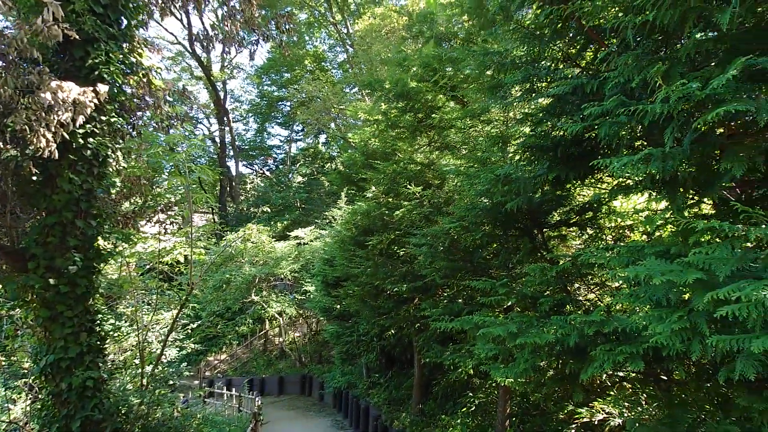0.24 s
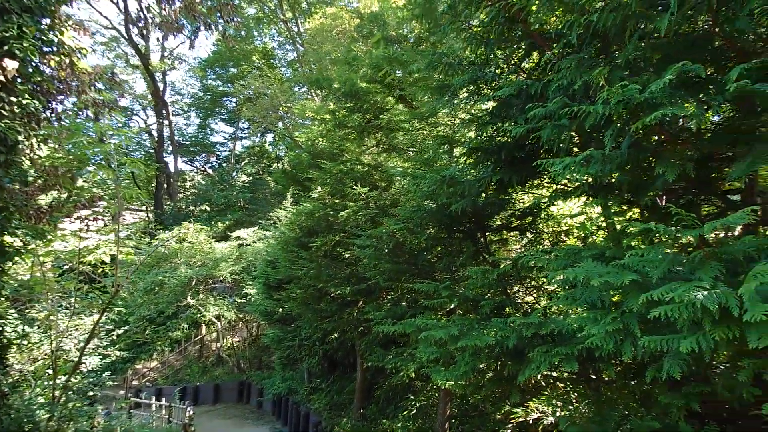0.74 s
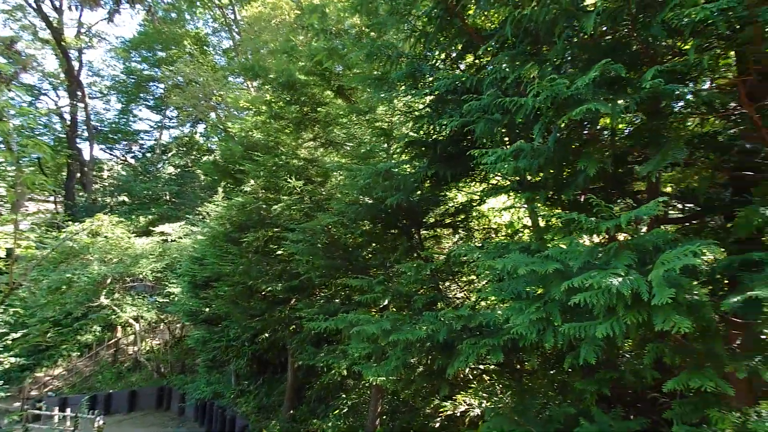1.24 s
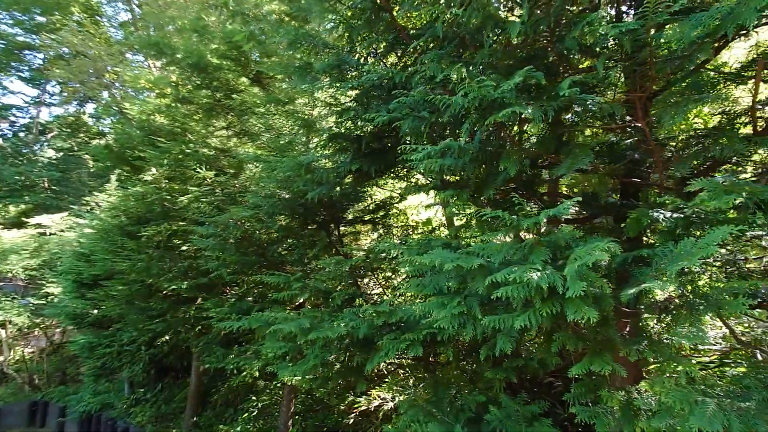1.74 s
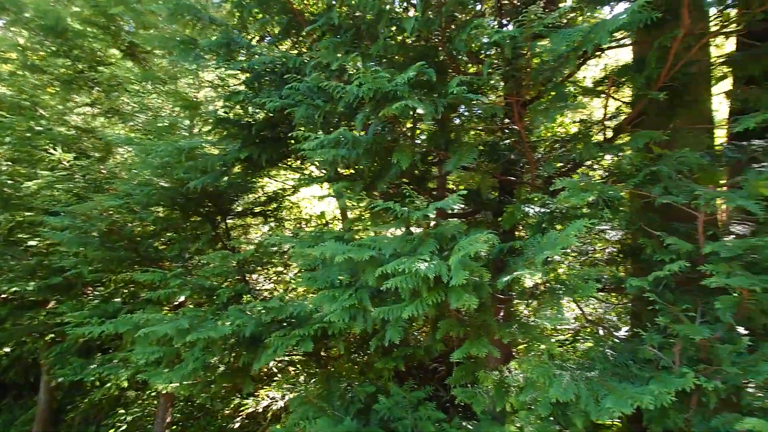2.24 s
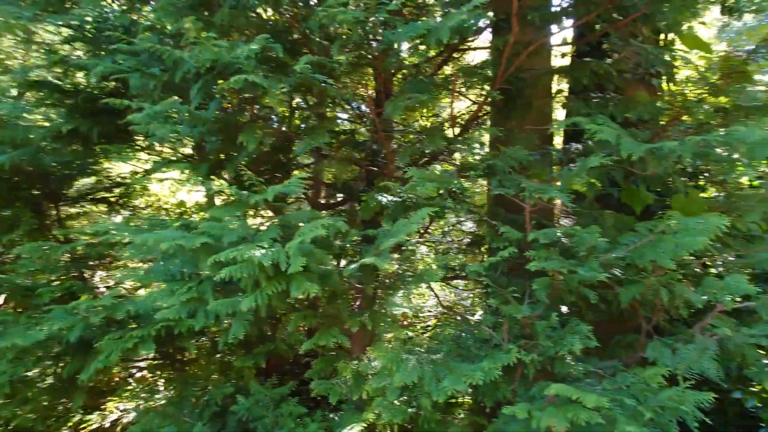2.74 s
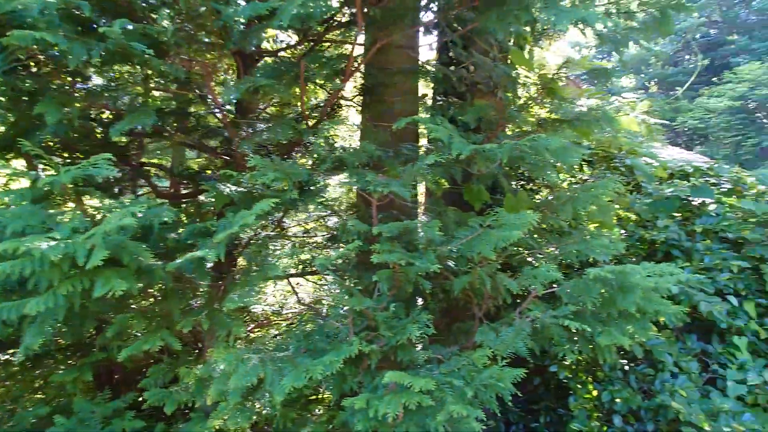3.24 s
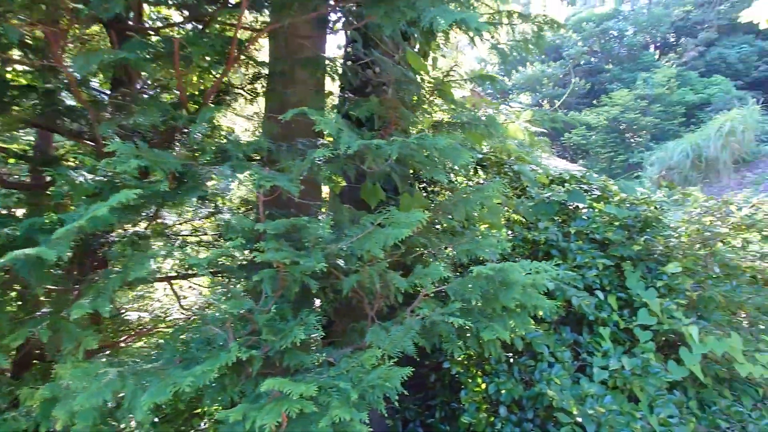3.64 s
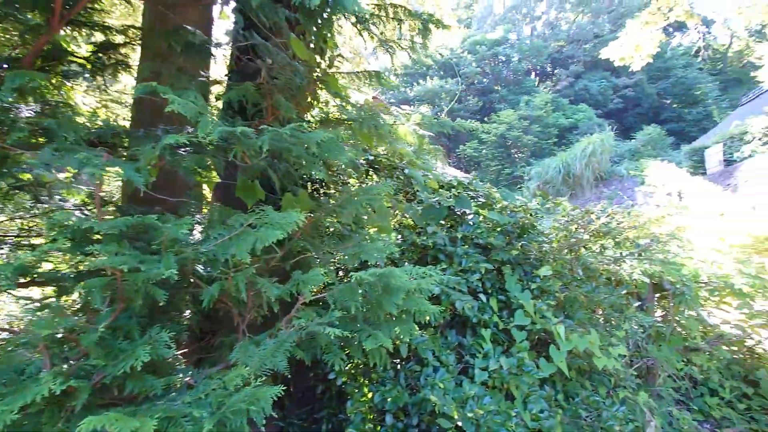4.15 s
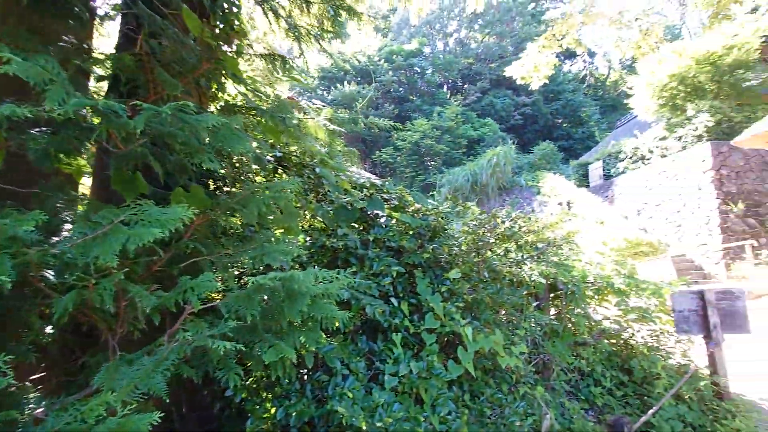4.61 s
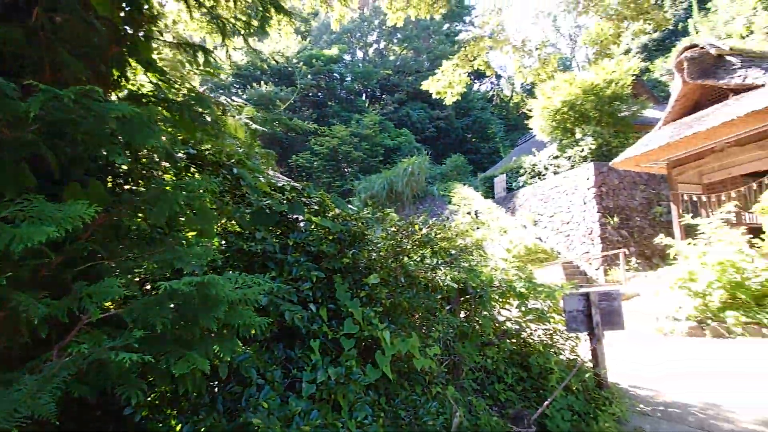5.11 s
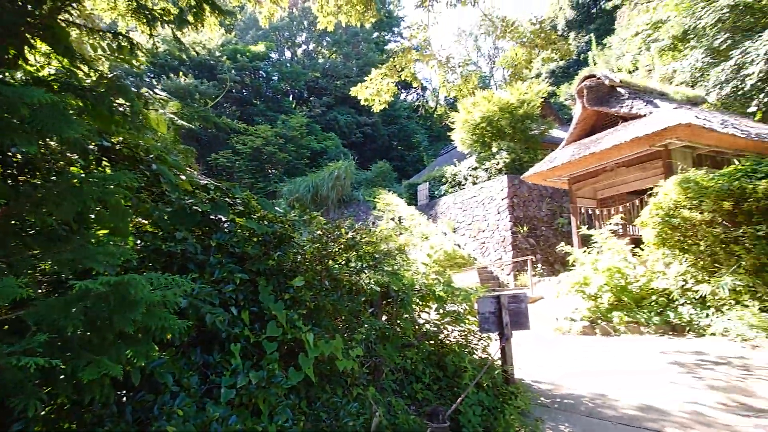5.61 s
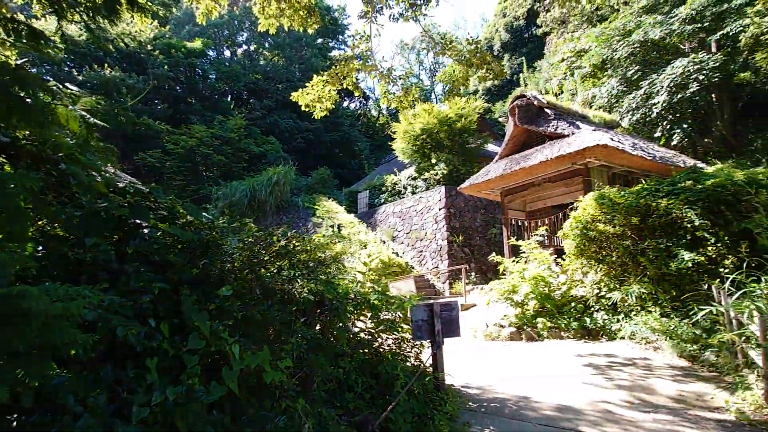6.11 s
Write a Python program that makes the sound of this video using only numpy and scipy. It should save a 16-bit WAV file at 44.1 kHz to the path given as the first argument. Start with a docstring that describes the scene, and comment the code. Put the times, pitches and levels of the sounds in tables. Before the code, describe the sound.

In a summer wood, a dense chorus of cicadas hisses and sizzles without a break, the nearest ones on the right. The shrill sound wavers only slightly, and thin tones from single distant cicadas enter from about the middle. A few soft handling knocks touch the microphone along the way. A barely audible crow calls far off, and a faint low rumble and hum lie underneath.

```python
"""A crowd of cicadas shrills near 8 kHz in tall summer trees, each clicking two tiny drum skins.
A few sizzling cicadas on the right pump their bellies, rocking between a low and a high resonance.
Far-off cicadas blur into a thin whine, and single ones join in on their own pitch.
Beneath lie a distant crow, a few soft knocks of a hand on the microphone, a faint rumble and low hums."""
import sys
import numpy as np
from scipy import signal
from scipy.fft import rfft, irfft, next_fast_len
from scipy.io import wavfile

SR = 44100
rng = np.random.default_rng(int(sys.argv[2]) if len(sys.argv) > 2 else 0)


def master(y):
    """Save y as 16-bit WAV."""
    cut = np.clip(np.atleast_2d(y).T, -1, 1)
    pcm = np.round(cut * 32767)  # scale
    wavfile.write(sys.argv[1], SR, pcm.astype(np.int16))


N = 280917

# body resonance of the shrill cicadas: pitch_hz, gain_db
SHRILL_BODY = [(4060, -48), (6900, -17), (7760, -1), (8410, 1.5), (11600, -23), (15100, -37), (22000, -120)]
# how the shrill crowd's loudness moves: time_s, relative_level_db
SHRILL_LOUDNESS = [(0.0, -29), (0.67, -30), (0.96, -29), (2.68, -32), (4.74, -30), (6.37, -31)]
# low body resonance of the sizzlers: pitch_hz, gain_db
SIZZLE_LOW_BODY = [(2060, -29), (3500, -22.5), (5100, -3), (6070, 0.5), (6850, -3.5), (7100, -5),
                   (9230, -29), (15600, -120)]
# high body resonance of the sizzlers: pitch_hz, gain_db
SIZZLE_HIGH_BODY = [(5000, -70), (8000, -30), (11000, -12), (12000, -8.5), (13000, -8), (14000, -4.5),
                    (15000, 0), (15800, .5), (16400, -30)]
# loudness of the high sizzle, dipping and rising as the microphone turns: time_s, relative_level_db
SIZZLE_HIGH_LOUDNESS = [(0.1, -43), (0.6, -43), (1.46, -45), (1.65, -43), (2.6, -45), (3.45, -42),
                        (5.36, -42), (6.37, -43)]
# steady ringing within the sizzle: pitch_hz, width_hz, gain_db
SIZZLE_RINGING = [(5340, 41, -4), (6230, 90, 1)]
# narrow resonances of the far cicadas: pitch_hz, width_hz, gain_db
WHINE_RESONANCES = [(2160, 200, -4.5), (2380, 190, -6.5), (2560, 50, -7), (2755, 60, -0.5),
                    (2823, 100, 0.5), (3240, 100, -9), (3464, 50, -8), (3770, 62, -6)]
# single far cicadas joining in: start_s, length_s, pitch_hz, level_db
SOLO_SONGS = [(2.6, 4.9, 4935, -51), (2.8, 1.9, 2818, -64.5), (2.9, 4.1, 2561, -68),
              (3.3, 3.7, 5300, -54.5), (5.2, 1.8, 5900, -53), (5.6, 1.4, 2825, -65.5)]
# caws of the crow: start_s, length_s, throat_pitch_hz, relative_level_db
CROW_CAWS = [(1.48, .54, 885, -64), (3.59, 0.52, 930, -61.2), (5.9, 0.15, 870, -69)]
# hand knocks, where harder touches tend to be higher and shorter: start_s, relative_peak_db, pitch_hz
HAND_KNOCKS = [(.09, -45.5, 310), (1.446, -40, 2300), (1.54, -56, 170), (2.429, -55, 130),
               (3.336, -48, 850), (3.9, -60, 100), (4.135, -57, 60), (4.929, -51, 260), (5.035, -52, 170)]
# tone colour of the outdoor rumble: pitch_hz, gain_db
RUMBLE_COLOUR = [(15, -47), (25, -11.5), (112, -7.5), (151, -1), (234, 1), (377, -0.3), (564, -5),
                 (800, -5.5), (893, -4), (1050, -5), (1440, -6.5), (2000, -6.5), (2600, -38), (4400, -120)]
# how alike the rumble is at both ears: pitch_hz, likeness_0_to_1
RUMBLE_LIKENESS = [(40, 0), (90, 0), (170, .55), (350, 0.74), (700, 0.7), (1400, 0)]
# which side each pitch comes from: pitch_hz, left_minus_right_db
SIDE_BY_PITCH = [(60, -1.5), (200, -6.5), (450, -1.5), (1000, -6.5), (3300, -8.5), (4300, -3.5), (5700, -9),
                 (6700, -18.5), (7700, -4.2), (9000, -8), (11300, -12.5), (12600, -13.5), (15300, -13.5)]
# the microphone turns past the trees (scene centres and softens this): time_s, left_minus_right_db
MICROPHONE_TURN = [(0.0, -8.0), (0.49, -6.0), (3.23, -5.0), (5.14, -7.5), (6.37, -5.5)]


def shrill_crowd(count=6):
    """Many cicadas, each at its own click rate and swelling and fading, plus one nearer than the rest."""
    crowd = 0
    for clicks_per_s in rng.uniform(280, 560, count):
        song = drum_clicks(clicks_per_s, wander=.015, jitter=.05, rough_db=3.5)
        song = song * from_db(2 * drift(3.2))
        crowd = crowd + leaf_echoes(song, echo_db=4, fade_s=.25)
    near = drum_clicks(440, wander=.002, jitter=.015, rough_db=3)
    near = leaf_echoes(near, echo_db=-2, fade_s=.26)
    snaps = (rng.random((2, N)) < 4 / SR) * rng.uniform(4, 11, (2, N))   # odd clicks stand out
    chorus = unit_level(crowd) + from_db(-8) * unit_level(near) + from_db(-2.5) * hiss() + snaps
    return from_db(over_time(SHRILL_LOUDNESS) + 3.9) * colour(chorus, SHRILL_BODY)


def drum_clicks(clicks_per_s, wander, jitter, rough_db):
    """A cicada's two drum skins (tymbals) buckle in turn, making slightly uneven clicks."""
    cycles = np.cumsum(clicks_per_s * (1 + wander * drift(2))) / SR + rng.random()
    beats = np.arange(1, int(cycles[-1]))
    click_at = np.searchsorted(cycles, beats + jitter * rng.standard_normal(len(beats)))
    click_db = rough_db * rng.standard_normal(len(beats)) - 2 * (beats % 2)   # one skin is softer
    clicks = np.zeros(N)
    clicks[np.minimum(click_at, N - 1)] = from_db(click_db)
    return unit_level(clicks)


def sizzlers(count=5, pumps_per_s=15.6):
    """A pumping belly swings the song between two resonances; neighbours fill in around the near cicada."""
    pump_rate = pumps_per_s * (1 + .015 * drift(1))
    pump = np.cos(2 * np.pi * np.cumsum(pump_rate) / SR)
    near = drum_clicks(398.6, wander=.0024, jitter=.006, rough_db=2)
    near = unit_level(leaf_echoes(near, echo_db=-2, fade_s=.2))
    neighbours = 0
    for clicks_per_s in rng.uniform(340, 400, count):
        song = drum_clicks(clicks_per_s, wander=.02, jitter=.06, rough_db=3.5)
        neighbours = neighbours + leaf_echoes(song, echo_db=1, fade_s=.21)
    neighbours = unit_level(neighbours)
    low = colour(neighbours + from_db(-14) * near + from_db(-4) * hiss(), SIZZLE_LOW_BODY)
    low = low + from_db(-10.5) * resonate(hiss(), SIZZLE_RINGING)
    high = colour(neighbours + from_db(1) * near + from_db(-2) * hiss(), SIZZLE_HIGH_BODY)
    top = filtered(high, lambda hz: at_pitch([(13300, .2), (14300, .66)], hz))   # the very top throbs most
    low = low * (1 - .12 * pump) * growing(start_db=-39.2, db_per_s=.28)
    high = (high + .25 * pump * top) * from_db(over_time(SIZZLE_HIGH_LOUDNESS) + 4.8)
    return low + high


def far_whine(throbs_per_s=15.5):
    """Distance smears the clicks into narrow bands of noise that still throb."""
    throb = np.sin(2 * np.pi * np.cumsum(throbs_per_s + .72 * drift(.9)) / SR)
    whine = resonate(hiss(), WHINE_RESONANCES) * (1 + .15 * throb)
    return whine * growing(start_db=-60.3, db_per_s=.33)


def solo_cicadas(width_share=.007):
    """Single far cicadas, blurred by many paths into thin tones that swell, waver and fade."""
    out = 0
    for start_s, length_s, pitch_hz, level_db in SOLO_SONGS:
        loudness = from_db(level_db + 1.2 * drift(3)) * swell(start_s, start_s + length_s)
        out = out + loudness * resonate(hiss(), [(pitch_hz, width_share * pitch_hz, 0)])
    return out


def crow():
    """Hoarse caws, blurred by the wood to two throat resonances that swell and fade."""
    out = 0
    for start_s, length_s, pitch_hz, level_db in CROW_CAWS:
        throat = resonate(hiss(), [(pitch_hz, 130, 0), (1.24 * pitch_hz, 330, -6)])
        loudness = from_db(level_db + 4 + .89 * drift(14)) * swell(start_s, start_s + length_s)
        out = out + loudness * throat
    return out


def hand_knocks(fade_cycles=16, casing_hz=470):
    """Each touch is a short scuff, dulled by the soft hand, that rings briefly with the casing."""
    out = np.zeros((2, N))
    t = np.arange(SR // 5) / SR
    for start_s, peak_db, pitch_hz in HAND_KNOCKS:
        noise = rng.standard_normal(len(t)) + .5 * rng.standard_normal((2, len(t)))
        scuff = noise * from_db(-60 * t * pitch_hz / fade_cycles)
        dulled = signal.lfilter(*signal.butter(2, 2 * pitch_hz, fs=SR), scuff)
        knock = resonate(dulled, [(pitch_hz, .69 * pitch_hz, 0), (casing_hz, 300, 2)])
        start = round(start_s * SR)
        out[:, start:start + len(t)] += from_db(peak_db + 2.7) * knock / np.abs(knock).max()
    return out


def rumble():
    """Far-off air and traffic make a flickering murmur that swells once."""
    middle, side = hiss()
    shared = filtered(middle, lambda hz: np.sqrt(1 + at_pitch(RUMBLE_LIKENESS, hz)))
    apart = filtered(side, lambda hz: np.sqrt(1 - at_pitch(RUMBLE_LIKENESS, hz)))
    level_db = -64.4 + 2.3 * swell(start_s=1.3, end_s=5.2) + 1.36 * drift(8.3)
    return from_db(level_db) * colour(np.array([shared + apart, shared - apart]), RUMBLE_COLOUR)


def low_hums(pitches_hz=(180, 225), width_hz=45):
    """Faint hums come and go at random; their long waves reach both ears alike."""
    return sum(from_db(-78.5 + 4 * drift(2.5)) * resonate(rng.standard_normal(N), [(hz, width_hz, 0)])
               for hz in pitches_hz)


def leaf_echoes(sound, echo_db, fade_s):
    """Sound goes straight to each ear, then echoes off leaves and trunks, dying 60 dB in fade_s."""
    t = np.arange(SR // 3) / SR
    paths = rng.standard_normal((2, len(t))) * from_db(-60 * t / fade_s)
    paths *= from_db(echo_db) / np.sqrt(np.sum(paths ** 2, axis=1, keepdims=True))
    paths[[0, 1], rng.integers(0, 60, 2)] += 1   # the straight path to each ear
    size = next_fast_len(N)
    return irfft(rfft(sound, size) * rfft(paths, size), size)[:, :N]


def hiss():
    """Sound from countless far paths merges into a smooth hiss, different at each ear."""
    return rng.standard_normal((2, N))


def resonate(sound, resonances):
    """Ring a sound at each (pitch_hz, width_hz, gain_db); the sum comes out at level 1."""
    out = 0
    for pitch_hz, width_hz, gain_db in resonances:
        band = signal.iirpeak(pitch_hz, pitch_hz / width_hz / 1.5, fs=SR)
        ringing = signal.lfilter(*band, signal.lfilter(*band, sound))   # twice, for steep edges
        out = out + from_db(gain_db) * ringing
    return unit_level(out)


def colour(sound, table):
    """Shape a sound's tone with a table of (pitch_hz, gain_db); it comes out at level 1."""
    return unit_level(filtered(sound, lambda hz: from_db(at_pitch(table, hz))))


def filtered(sound, gain_at_hz):
    """Turn each pitch in a sound up or down by its own gain."""
    size = next_fast_len(N)
    hz = np.arange(size // 2 + 1) * SR / size
    return irfft(rfft(sound, size) * gain_at_hz(hz), size)[..., :N]


def drift(turns_per_s):
    """A smooth random wobble, about 1 in size."""
    step, warm_up = 40, 2000
    memory = np.exp(-2 * np.pi * step * turns_per_s / SR)
    noise = rng.standard_normal(N // step + warm_up + 2)
    slow = signal.lfilter([1], [1, -2 * memory, memory ** 2], noise)[warm_up:]
    return np.interp(np.arange(N) / step, np.arange(len(slow)), unit_level(slow))


def swell(start_s, end_s):
    """A rounded rise from 0 to 1 and back."""
    progress = np.clip((np.arange(N) / SR - start_s) / (end_s - start_s), 0, 1)
    return np.sqrt(np.abs(np.sin(np.pi * progress)))


def growing(start_db, db_per_s):
    """A gain that climbs steadily."""
    return from_db(start_db + db_per_s * np.arange(N) / SR)


def over_time(table):
    """Read a table of (time_s, value) at every sample."""
    return np.interp(np.arange(N) / SR, *np.transpose(table))


def at_pitch(table, hz):
    """Read a table of (pitch_hz, value), with octaves evenly spaced."""
    pitches_hz, values = np.transpose(table)
    return np.interp(np.log(hz + 1e-9), np.log(pitches_hz), values)


def from_db(db):
    """Turn decibels into a gain to multiply by."""
    return 10 ** (np.asarray(db) / 20)


def unit_level(sound):
    """Scale a sound to an average (rms) level of 1."""
    return sound / np.sqrt(np.mean(sound ** 2) + 1e-20)


def lean(left_minus_right_db):
    """Left and right gains that move a sound to one side."""
    return from_db(left_minus_right_db * np.array([[.5], [-.5]]))


def ear_gains(hz):
    """Place each pitch to the side while keeping its total power."""
    gains = lean(at_pitch(SIDE_BY_PITCH, hz))
    return gains / np.sqrt(np.mean(gains ** 2, axis=0))


def scene():
    """All layers together; the nearest trees stand on the right."""
    cicadas = shrill_crowd() + sizzlers() + far_whine() + solo_cicadas()
    turn_db = over_time(MICROPHONE_TURN)
    cicadas = cicadas * lean(.8 * (turn_db - turn_db.mean()))
    background = rumble() + low_hums() + crow() + hand_knocks()
    return filtered(cicadas + background, ear_gains)


def record(dry):
    """The highest treble is cut off steeply."""
    cutoff_hz = 15760
    return signal.sosfilt(signal.ellip(14, .1, 80, cutoff_hz, fs=SR, output="sos"), dry)


dry = scene()
out = record(dry)
master(out)
```